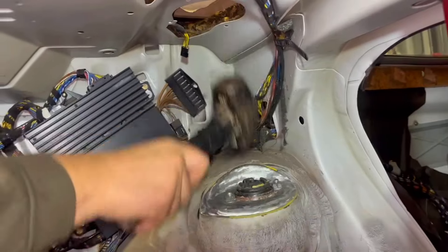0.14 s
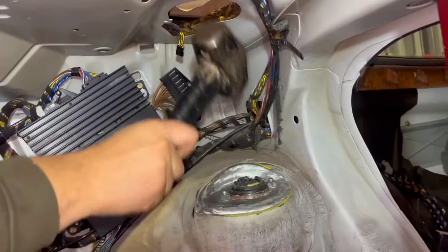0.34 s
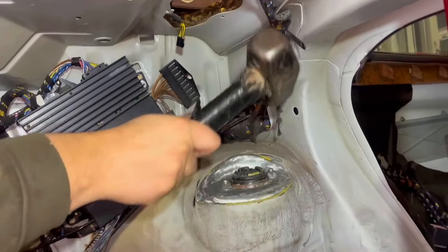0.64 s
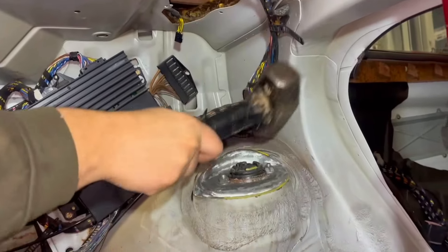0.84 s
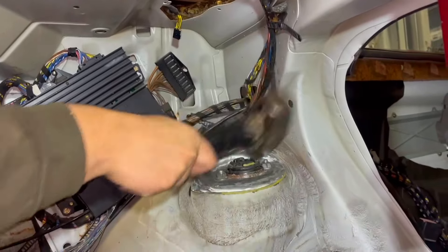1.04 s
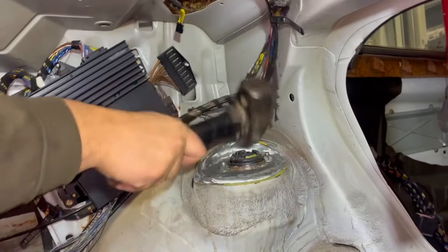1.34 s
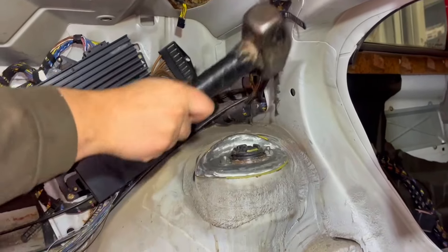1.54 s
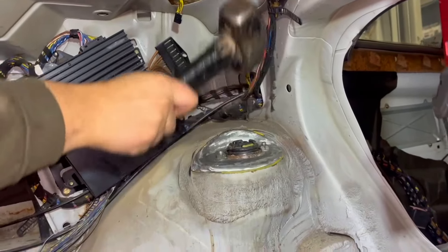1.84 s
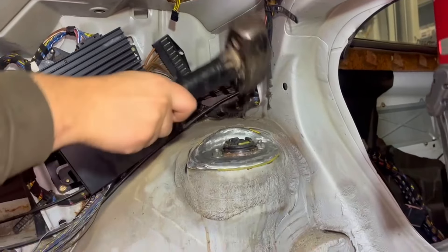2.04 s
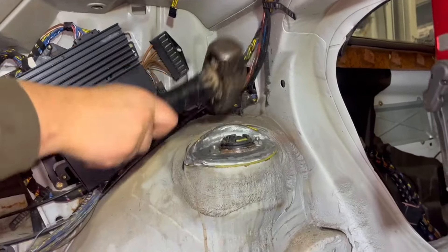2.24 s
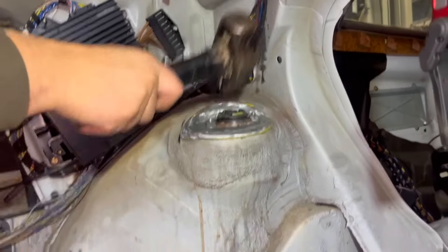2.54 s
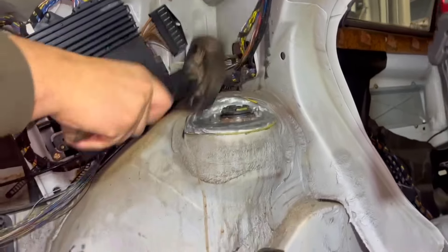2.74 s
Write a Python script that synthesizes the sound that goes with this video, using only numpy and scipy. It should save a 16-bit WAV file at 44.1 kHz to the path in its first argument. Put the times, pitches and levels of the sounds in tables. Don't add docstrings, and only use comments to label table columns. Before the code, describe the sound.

A steel hammer strikes the sheet metal of a car body about three times a second, first sharp and cracking, then brighter, then louder and duller, the last weak; close stereo microphone in a garage.

```python
import sys
import numpy as np
from scipy import signal
from scipy.io import wavfile

SR = 44100
rng = np.random.default_rng(int(sys.argv[2]) if len(sys.argv) > 2 else 0)


def undo_db(level):
    steps = np.asarray(level, float) / 20
    return 10 ** steps


def pcm_store(signal):
    levels = np.round(np.clip(np.atleast_2d(signal), -1, 1) * 32767)
    wavfile.write(sys.argv[1], SR, levels.astype(np.int16).T)


N = 127890

SPOT = [0, 0, 1, 2, 3, 4, 4, 4, 4, 5]
# f/Hz, phase/rad
LEAD = [(60, 1.53), (430, -0.69), (690, -1.85), (1100, -1.64), (1810, 0.97), (2500, 1.33), (3700, 1.26),
        (5500, -0.83)]


def hammer():
    # t/s, level/dB, brightness/(dB per octave), crack level/dB, crack brightness/(dB per octave)
    blow_table = [
        (0.1228, -8.5, 1.94, 6, -0.9),
        (0.4321, -7.5, 1.6, 6.5, -0.56),
        (.7440, -9, 1.5, -13, 1.5),
        (1.0595, -12, 3.23, -6, 0.5),
        (1.3508, -8, 2.5, -5, -0.5),
        (1.6300, -5, 1.5, 3, -5.5),
        (1.9231, -5.5, 1, 1, -8.5),
        (2.1961, -6, 2, -1, -10),
        (2.4680, -6, 1.5, -1, -17),
        (2.7566, -15.5, 3.5, -5, 0.9),
    ]
    # t/s after the first, level/dB against it
    second_touch = [
        (0.015, -13),
        (0.016, -14.5),
        (.009, 1.5),
        (0.00859, 2.5),
        (0.00605, -9),
        (0.00694, -14.5),
        (0.00709, -11.5),
        (0.00705, -10.5),
        (0.00727, -15.5),
        (0.00606, -1.5),
    ]
    start, level_db, tilt, crack_db, crack_tilt = np.transpose(blow_table)
    length = SR // 2
    short = length // 3
    rings = shell(length)
    rings[..., :short] += panel(tilt, short) + first_arrival(crack_db, crack_tilt, short)

    out = np.zeros((2, N + 2 * length))
    t = np.arange(900) / SR
    soft_s = 0.0007
    for k, (after, second_db) in enumerate(second_touch):
        soft = np.exp(-0.5 * ((t - after) / (soft_s / 4)) ** 2)
        contact = undo_db(second_db) * soft / soft.sum() + (t == 0)
        hit = undo_db(level_db[k] + 9.5) * signal.fftconvolve(rings[k], contact[None], axes=1)
        i = int(start[k] * SR)
        out[:, i:i + hit.shape[1]] += hit
    return out[:, :N]


def shell(length):
    # f/Hz, level/dB, T60/s, left-right level/dB
    strong_modes = [(64, -16.5, 0.31, 2.7), (72.9, -11.5, 0.19, -4.5), (83.35, -20, 0.33, -4.8),
                    (117.4, -22.5, 0.22, 3.5), (139.8, -23, 0.19, 1.5), (212.1, -18.5, 0.16, 7.5),
                    (249, -11, 0.08, 11.5), (269.4, -33, 0.33, 15), (406.3, -19, 0.17, 6),
                    (490, -14, 0.063, 10.5), (609, -18.5, 0.074, 2), (768.6, -20.5, 0.098, 2.5),
                    (908.2, -14, 0.053, 5), (1375, -31, 0.09, -1.8)]
    # under 100 Hz, to 230 Hz, to 450 Hz, to 550 Hz, above
    spot_feed = [(-3, -4.5, 0.5, -2, -7), (-5.5, -3.5, -0.5, 6.5, -6), (-1, -1.2, 2.5, 3, 0),
                 (1, 1.1, 3.5, 2, 6), (-3.5, 0.45, -0.83, 4.7, 5.14), (10, 5.5, 3.5, -27.5, -10)]
    feed_edges = [100, 230, 450, 550]
    hz, db, t60, lean_db = np.transpose(strong_modes)
    gains = undo_db(db + np.array(spot_feed)[SPOT][:, np.searchsorted(feed_edges, hz)])
    bend = np.where(hz > 300, 1.17, 1)[:, None]
    rise_cycles = 1.52

    def fall_db(t):
        return -60 * (t / t60[:, None]) ** bend + onset_db(t * hz[:, None] / rise_cycles)

    return modes(hz, fall_db, gains, lean_db, at_hz(LEAD, hz), length)


def panel(tilt, length):
    # f/Hz, level/dB
    ring_colour = [(310, -7.5), (520, 0), (900, -6), (1500, -11.5), (2000, -22.5), (4800, -23), (6300, -38),
                   (8000, -51)]
    # f/Hz, T60/s
    ring_t60 = [(150, 0.13), (500, 0.13), (1500, .11), (4000, 0.096), (6000, 0.094), (7200, 0.039),
                (12000, 0.021)]
    # f/Hz, left-right level/dB
    balance = [(60, -2), (150, 17.5), (370, -2.5), (930, -0.1), (2320, 4.5), (5780, -1.5)]
    count, rise_s = 640, 0.0011
    bend = 1.177
    hz = np.r_[np.linspace(120, 7000, 500), np.linspace(7000, 15000, 140)]
    hz = hz + rng.uniform(-6, 6, count)
    spacing_db = np.where(hz < 7000, 0, 6) - 27 * np.maximum(np.log2(hz / 8000), 0)
    colour_db = at_hz(ring_colour, hz) + np.outer(tilt, np.log2(hz / 1000))

    fresh = hz / (hz + 2500)
    same = rng.standard_normal((6, count))[SPOT]
    new = rng.standard_normal((len(SPOT), count))
    shape = np.sqrt(1 - fresh) * same + np.sqrt(fresh) * new
    gains = shape * undo_db(-26 + spacing_db + colour_db)

    scatter = 0.7 * np.minimum(hz / 400, 1) * rng.standard_normal(count)
    t60 = at_hz(ring_t60, hz)[:, None]

    def fall_db(t):
        return -60 * (t / t60) ** bend + onset_db(t / rise_s)

    return modes(hz, fall_db, gains, at_hz(balance, hz), at_hz(LEAD, hz) + scatter, length)


def first_arrival(crack_db, crack_tilt, length):
    # f/Hz, level/dB
    crack_colour = [(300, -37.5), (839, -0.8), (1840, -17.5), (2400, 1), (3200, -14), (4100, -0.5),
                    (6000, -47.5), (9000, -36)]
    # f/Hz, left-right level/dB
    balance = [(60, -2), (150, 17.5), (370, -2.5), (930, -0.1), (2320, 4.5), (5780, -1.5)]
    hz = np.geomspace(300, 15000, 24)
    decay_cycles, rise_cycles = 18.2, 4.5
    colour_db = at_hz(crack_colour, hz) - 27 * np.maximum(np.log2(hz / 9000), 0) + 10 * np.log10(hz)
    tilt_db = np.outer(crack_tilt, np.log2(np.minimum(hz, 6000) / 800))
    gains = undo_db(-33 + colour_db + crack_db[:, None] + tilt_db) * (-1) ** np.arange(24)

    def fall_db(t):
        return -60 * t * hz[:, None] / decay_cycles + onset_db(t * hz[:, None] / rise_cycles)

    return modes(hz, fall_db, gains, at_hz(balance, hz), at_hz(LEAD, hz), length)


def modes(hz, fall_db, gains, lean_db, lead, length):
    late_s, late_power = 0.0036, 0.562
    boom_late_s = 0.009
    delay = late_s * ((1400 / (hz + 400)) ** late_power - 0.3) + boom_late_s * (hz < 100)
    t = np.maximum(np.arange(length) / SR - delay[:, None], 0)
    wave = (t > 0) * undo_db(fall_db(t)) * np.exp(2j * np.pi * hz[:, None] * t)
    halves = [0.5, -0.5]
    phase = np.outer(halves, np.where(hz < 6500, lead, 1))
    ears = undo_db(np.outer(halves, lean_db)) * np.exp(1j * phase)
    return ((gains[:, None, :] * ears) @ wave).imag


def onset_db(x):
    return 20 * np.log10(1 - np.exp(-x) + 1e-6)


def at_hz(points, hz):
    p = np.array(points, float)
    return np.interp(np.log(hz), np.log(np.maximum(p[:, 0], 20)), p[:, 1])


def filtered(x, order, hz, kind):
    return signal.sosfilt(signal.butter(order, hz, kind, fs=SR, output="sos"), x)


def garage(x):
    # f/Hz, T60/s
    room_t60 = [(100, 0.45), (400, 0.31), (1500, 0.46), (5000, 0.52)]
    # f/Hz, level/dB
    room_colour = [(60, -36), (250, -26.5), (1000, -38), (2500, -42), (4500, -45), (7000, -36)]
    t = np.arange(SR // 2) / SR
    rise_s = 0.0067
    tail = 0
    for hz, band in bands(len(t), 0.65):
        tail = tail + band * undo_db(at_hz(room_colour, hz) - 60 * t / at_hz(room_t60, hz))
    tail = tail * (1 - np.exp(-t / rise_s)) * undo_db(-17)
    return signal.fftconvolve(x.mean(0)[None], tail, axes=1)[:, :N]


def air():
    # f/Hz, level/dB
    air_colour = [(18, -30), (30, 5.5), (428, -2), (1070, -18.5), (1460, -20), (1910, -37.5), (3190, -29),
                  (4560, -28.5), (6230, -53.5), (8100, -77), (13700, -120)]
    # t/s, level/dB
    air_level = [(0.0, -55.5), (0.66, -58), (0.86, -65), (1.12, -70.5), (1.79, -63), (1.82, -62.5),
                 (2.9, -65)]
    noise = sum(band * undo_db(at_hz(air_colour, hz)) for hz, band in bands(N, 0.23))
    s, db = np.transpose(air_level)
    return noise / noise.std() * undo_db(14.5 + np.interp(np.arange(N) / SR, s, db))


def bands(length, likeness):
    edges = 28 * 2 ** np.arange(0, 8.1, 0.5)
    white = rng.standard_normal((2, 2, length + 4000))
    alike = np.clip(likeness, 0, 1)
    for k, (low, high) in enumerate(zip(edges, edges[1:])):
        mid, side = filtered(white[k % 2], 2, [low, high], "band")[:, 4000:]
        hz = np.sqrt(low * high)
        c = 1 - (1 - alike) * hz ** 4 / (hz ** 4 + 220.0 ** 4)
        yield hz, np.sqrt(1 + c) * mid + np.sqrt(1 - c) * side * [[1], [-1]]


def scene():
    blows = hammer()
    faint = filtered(garage(blows) + air(), 10, 5830, "low")
    left, right = filtered(blows + faint, 2, [39, 14100], "band")
    side = filtered(left - right, 2, 105, "high")
    return 0.5 * (left + right + side * [[1], [-1]])


def roll_off(x):
    return signal.sosfilt(signal.butter(12, 16300, fs=SR, output="sos"), x)


def record(dry):
    x = np.tanh(dry)
    span = int(0.013 * SR)
    spread = rng.standard_normal(span) * np.linspace(0.35, 1, span) * undo_db(-20) / np.sqrt(span)
    bright = filtered(x, 2, [450, 5500], "band")
    x = x + signal.fftconvolve(bright, spread[None], axes=1)[:, -N:]
    return roll_off(x)


dry = scene()
out = record(dry)
pcm_store(out)
```